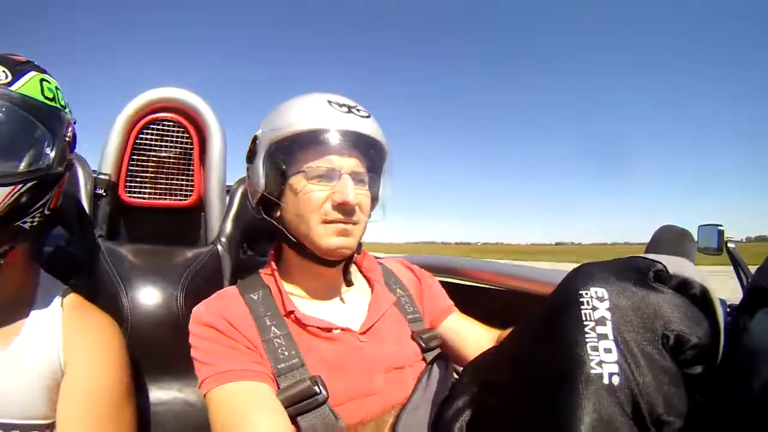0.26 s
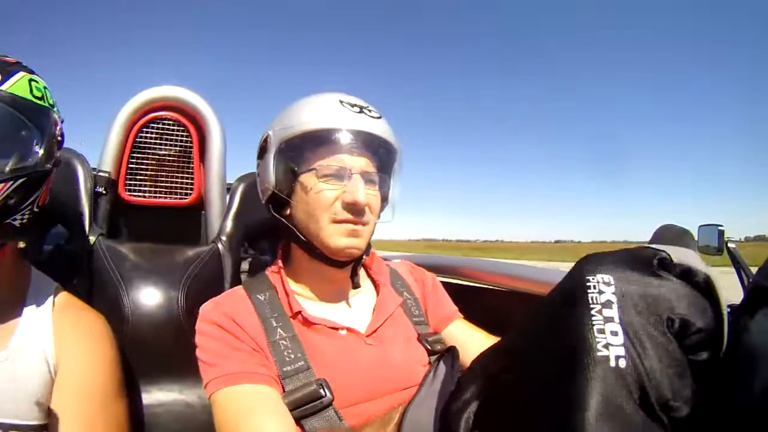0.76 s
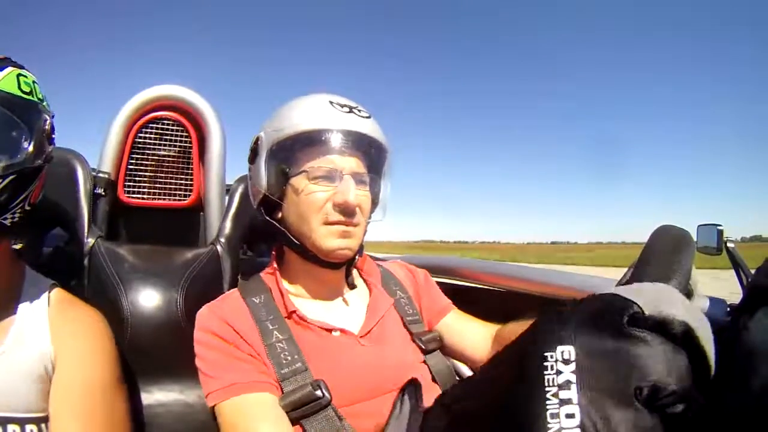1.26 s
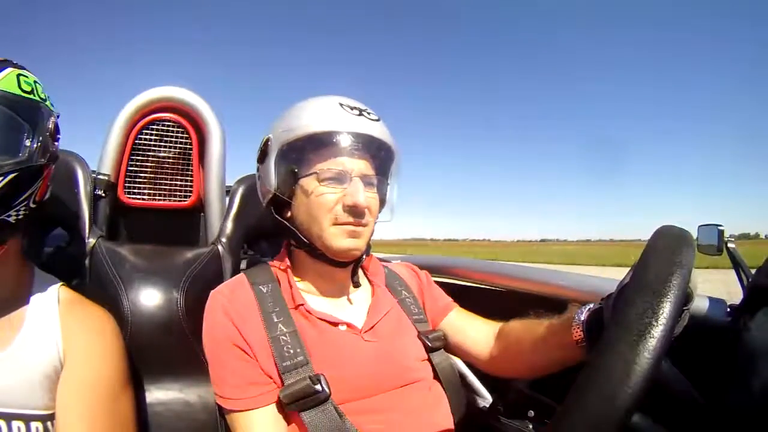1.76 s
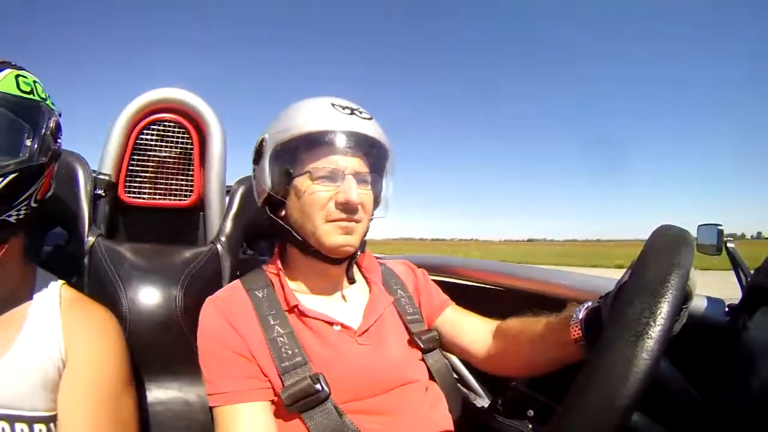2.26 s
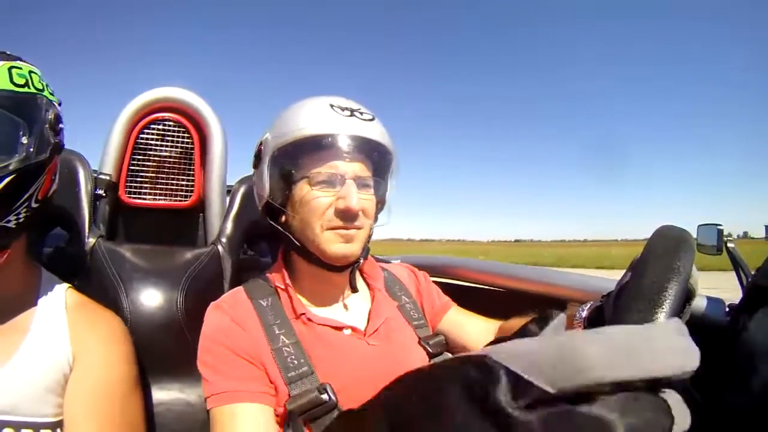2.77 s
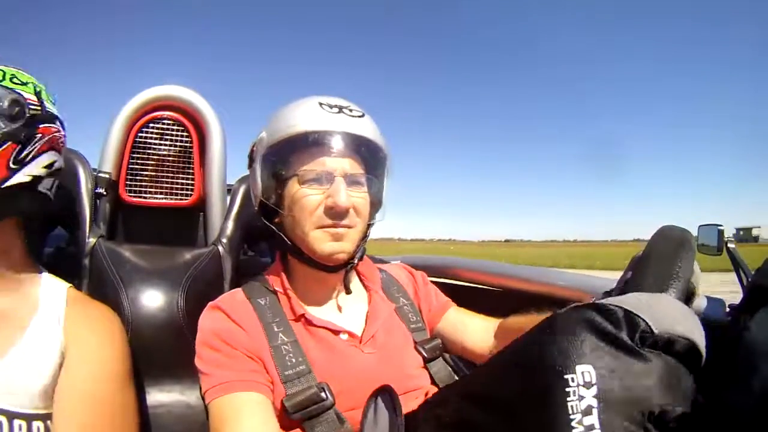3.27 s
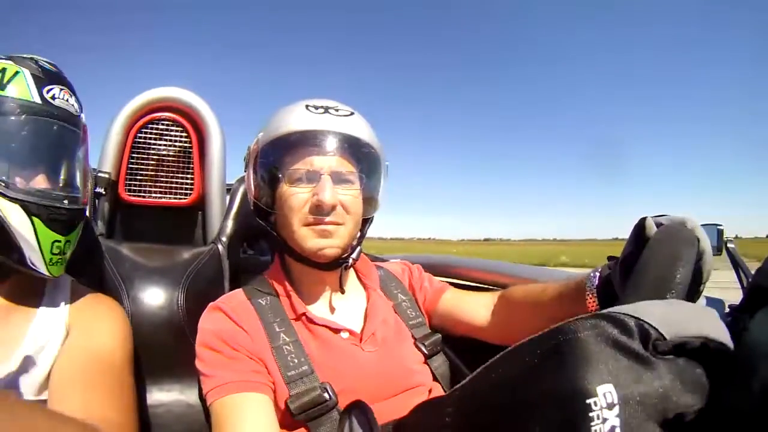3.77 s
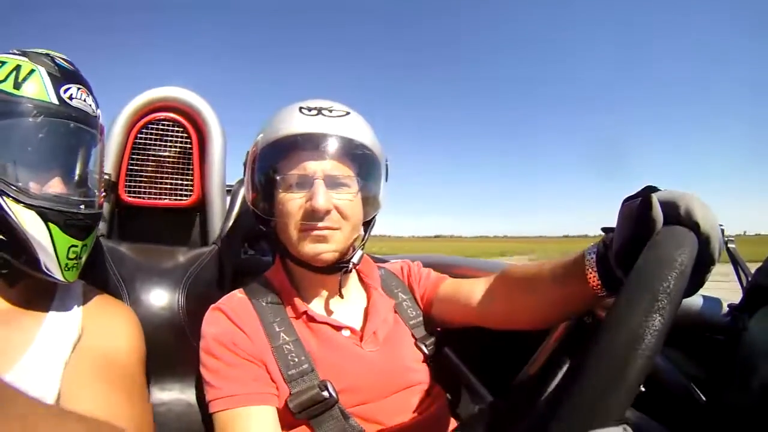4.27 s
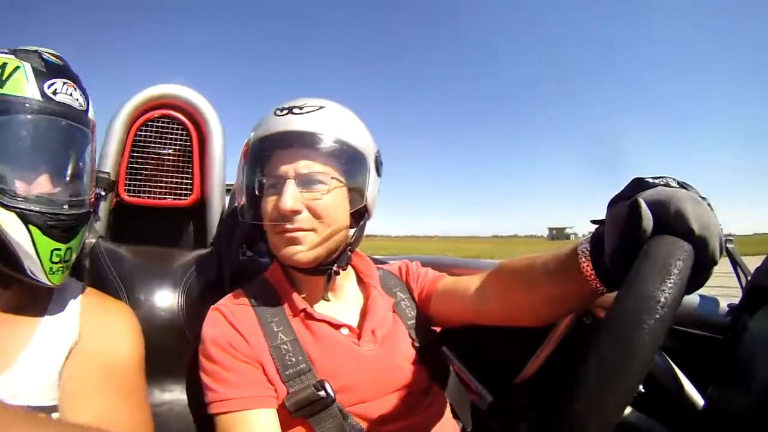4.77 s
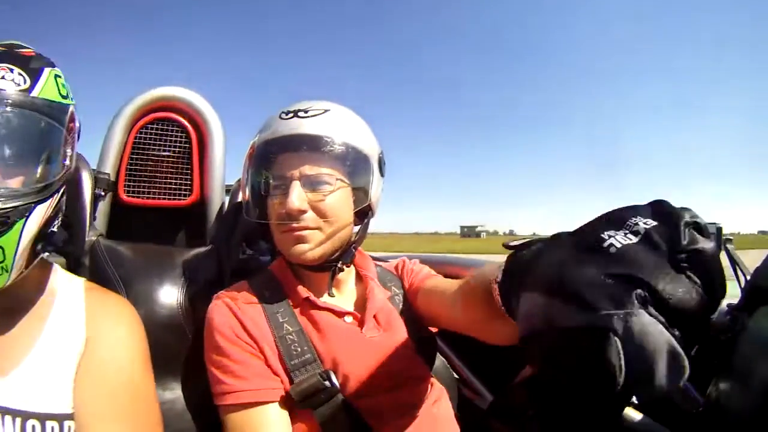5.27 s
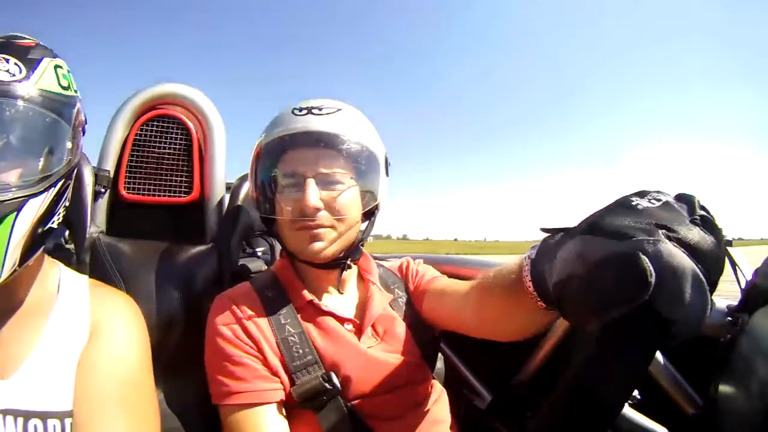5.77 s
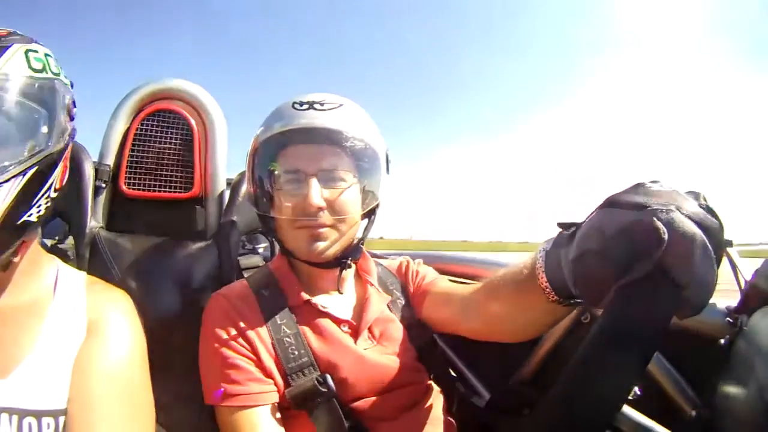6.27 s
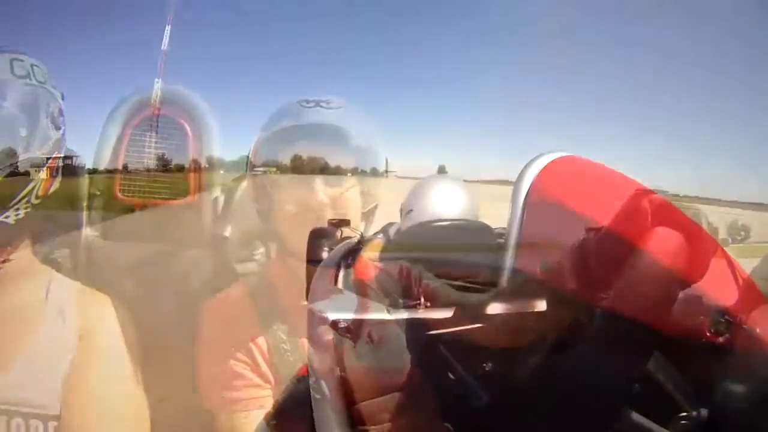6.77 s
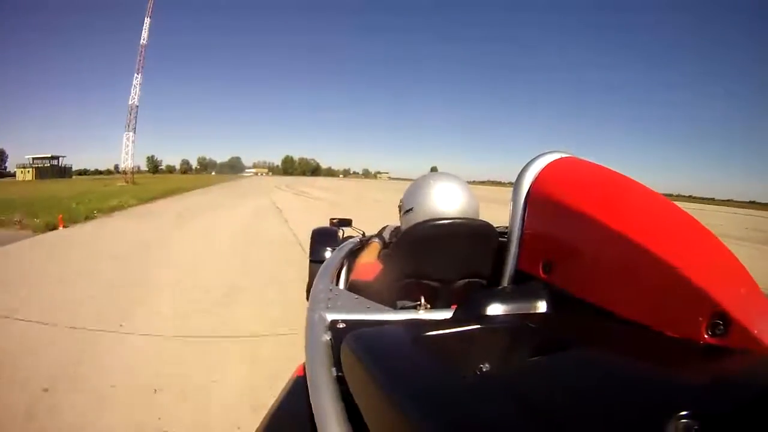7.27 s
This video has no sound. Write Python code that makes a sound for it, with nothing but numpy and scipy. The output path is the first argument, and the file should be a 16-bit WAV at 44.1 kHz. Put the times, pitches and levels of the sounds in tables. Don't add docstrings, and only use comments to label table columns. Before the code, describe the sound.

Close in an open cockpit, a loud four-cylinder exhaust drones downward, blips once on a downshift and sinks to a low rumble. Wind hiss and rattling fade with speed. A hand and cloth tap and scrape the microphone housing, then a tiny silence cuts to a mic beside the engine, overloaded and roaring as the car pulls away.

```python
import sys
import numpy as np
from scipy import signal
from scipy.fft import rfft, irfft, next_fast_len
from scipy.io import wavfile
from scipy.ndimage import uniform_filter1d, map_coordinates

SR = 44100
rng = np.random.default_rng(int(sys.argv[2]) if len(sys.argv) > 2 else 0)


def waveform_to_disk(signal):
    frames = np.transpose(np.atleast_2d(signal))
    scaled = np.clip(frames, -1, 1) * 32767
    samples = np.round(scaled).astype(np.int16)
    wavfile.write(sys.argv[1], SR, samples)


def convert_level_to_amplitude(level_db):
    exponent = np.asarray(level_db, float) / 20
    return 10 ** exponent


N = 332073

# t/s, f/Hz, level/dB
SLOWING = [(0, 179.2, -1), (1.0, 154.4, -0.5), (1.2, 151, -3), (1.8, 138.7, -10), (2.0, 130, -1),
           (2.3, 110.8, -3), (2.5, 100.1, 5), (2.62, 103, 5), (2.8, 122.9, -1.5), (3.0, 142.6, -4.5),
           (3.37, 132.5, 1), (3.71, 119.5, 2.5), (4.05, 109.9, -1), (4.56, 93.7, -1), (5.24, 81.6, -2.5),
           (5.75, 73.07, -6.5), (6.26, 68.26, -4), (6.98, 47.2, -11.5)]
# f/Hz, width/Hz, level/dB
TUB_MODES = [(97.44, 8.1, -9), (112.4, 11.9, -9.5), (133.1, 7.1, -20), (164.2, 20.6, -18.5),
             (245, 19.4, -9.5), (297, 31, -16), (487, 42, -14)]
# f/Hz, width/Hz, share lost/1
TUB_DIPS = [(104.8, 2.1, .75), (124.8, 3.6, 0.53), (147.5, 6.1, .6), (210, 14, .7), (550, 32, .85)]
# t/s, f/Hz, level/dB
PULLING = [(7.04, 50.04, 1), (7.11, 59.47, 1), (7.16, 62.7, 5), (7.22, 63.67, 3.5), (7.33, 69.87, 0.5),
           (7.37, 72.43, -5), (7.49, 78.87, -8.5), (7.53, 79.47, -17.5)]
# f/Hz, level/dB per Hz
SHUDDER = [(15, -14.5), (40, 3), (120, 4), (300, -9.5), (500, -14.5), (900, -26), (3000, -70.5)]
# f/Hz, width/Hz, level/dB
INTAKE = [(755, 410, 1.5), (1932, 326, 6), (4020, 2760, -20)]
# start t/s, end t/s
CUT = (6.986, 7.041)
# t/s, level/dB
RUNWAY = [(0, -8.5), (.29, -19.5), (.47, -8.5), (1.34, -17), (1.9, -16.5), (2.23, -16.5), (2.5, -24.5),
          (2.66, -20.5), (2.78, -18), (3.03, -20.5), (3.46, -16), (3.9, -20), (4.41, -13.5), (4.9, -14.5),
          (5.05, -28.5), (5.48, -20), (6.3, -30), (6.98, -28)]
# f/Hz, width/Hz, level/dB
BOOM = [(97.83, 16.9, 15), (138, 61, -29.5)]
# f/Hz, level/dB per Hz
BUFFET = [(8, -18.5), (25, 11), (45, 3.5), (70, 2.5), (120, -6.5), (300, -65)]
# t/s, width/s, level/dB
GUSTS = [
    (0, .04, 18),
    (1, 0.96, 3.5),
    (6.5, 0.1, 10),
    (6, .2, -6),
]
# f/Hz, level/dB per Hz
TYRES = [(76, -31.5), (130, -0.5), (194, -12.5), (245, -7.5), (301, -4.5), (323, -6.5), (394, -23.5),
         (471, -9.5), (533, -25), (626, -16.5), (812, -29.5), (971, -37), (1100, -45.5), (1430, -70.5),
         (2420, -120)]
# f/Hz, width/Hz, level/dB
MOUNT = [(2450, 900, -12.5), (4650, 1520, 6.5), (6850, 1600, -13), (8450, 1700, -3.5), (11060, 780, -5.5),
         (12900, 740, -8), (14300, 970, -9)]
# t/s, peak level/dB, shell level/dB, crack level/dB
TAPS = [(1.112, -11, -7, -17), (5.504, -26.5, -4, -20), (5.513, -14.5, -8, -15.5), (5.874, -45, 15, -13),
        (5.975, -24, -24, -6.5), (6.0634, -29.5, -6, -11.5), (6.121, -8.5, -39, -21),
        (6.1327, -27.5, -12, 6), (6.138, -9, 3, 2.5), (6.3227, -21, -13, -26), (6.369, -23.5, -20, -30),
        (6.409, -5, -1, -6), (6.4404, -16.5, -20, -16), (6.454, -30.5, -7, -11), (6.468, -33, 2, -11),
        (6.49, -30.5, -1, -6), (6.5032, -17, -3.5, -29), (6.5206, -27, 2, -25), (6.5316, -37.5, -9.5, -15),
        (6.5418, -35.5, -1.5, -11), (6.6076, -33.5, -14, -7), (6.7275, -31, -8, -20),
        (6.734, -23.5, -11, -23), (6.775, -36.5, -13, -9), (6.7838, -42.5, -8, -18), (6.8683, -45, -2, -11),
        (6.9252, -29, -19.5, -11.5), (6.9373, -21.5, -8.5, -22), (6.958, -35, -2.5, -8.5),
        (6.982, -30, -9, -4)]
# f/Hz, width/Hz, level/dB
THIN_WALLS = [(4360, 2500, 8), (7700, 11000, -16), (14000, 2500, -13)]
# t/s, length/s, level/dB
STROKES = [(5.523, 0.012, -38), (5.541, 0.037, -29), (5.573, 0.024, -36), (5.7, 0.052, -41),
           (5.756, 0.043, -33.5), (5.832, 0.029, -41), (5.88, 0.0091, -39), (5.938, 0.014, -46),
           (6.026, 0.016, -43), (6.087, 0.023, -45), (6.439, 0.024, -37), (6.574, 0.021, -51.5),
           (6.696, 0.0099, -50), (6.718, 0.014, -43), (6.785, 0.011, -48.5), (6.857, .015, -43.5)]
# f/Hz, level/dB per Hz
CLOTH = [(530, -42), (900, -15), (1400, -15), (2300, -4.5), (3100, -11.5), (4800, -19.5), (7400, -33),
         (11000, -46), (16000, -50)]
# t/s, width/s, size/full scale
PUSHES = [
    (6.151, 0.0064, 0.12),
    (6.425, 0.0058, -.3),
    (6.448, .004, -0.039),
    (6.458, 0.007, -0.34),
]
# t/s, level/dB
AIRFLOW = [(0, -18), (.72, -22.5), (1.11, -26), (1.75, -27.5), (2.41, -32), (2.78, -33.5), (3.05, -37.5),
           (3.58, -35.5), (4.12, -41.5), (4.53, -43.5), (5.48, -51.5), (5.89, -49.5), (6.34, -51),
           (6.71, -56.5), (6.98, -54.5)]
# f/Hz, level/dB per Hz
HISS = [(290, -20.5), (520, -10.5), (1000, -9), (1500, -8.5), (2200, 0.5), (2600, -1.5), (3300, -10),
        (5000, -14.5), (6200, -29), (8000, -38), (11000, -53.5), (16000, -67.5)]
# f/Hz, width/Hz, level/dB
PANELS = [(682, 68, -0.5), (1332, 267, 1.5), (2200, 290, -3.5), (2503, 120, -0.5)]


def unit(x):
    return x / np.sqrt(np.mean(x ** 2) + 1e-20)


def curves(rows):
    s, *columns = np.transpose(rows)
    return [np.interp(np.arange(N) / SR, s, column) for column in columns]


def wobble(rate):
    knots = rng.standard_normal(int(N * rate / SR) + 4)
    return map_coordinates(knots, [np.arange(N) * rate / SR])


def filtered(x, response):
    m = next_fast_len(N + SR // 2)
    return irfft(rfft(x, m) * response(np.fft.rfftfreq(m, 1 / SR)), m)[:N]


def resonance(f, center, width):
    return 1j * f * width / (center ** 2 - f ** 2 + 1j * f * width)


def modes(table):
    return lambda f: sum((-1) ** k * convert_level_to_amplitude(db) * resonance(f, hz, width)
                         for k, (hz, width, db) in enumerate(table))


def rush(spectrum):
    hz, db = np.transpose(spectrum)
    colour = lambda f: convert_level_to_amplitude(np.interp(np.log(f + 1), np.log(hz + 1), db))
    return unit(filtered(rng.standard_normal(N), colour))


def rung(table):
    return unit(filtered(rng.standard_normal(N), lambda f: modes(table)(f) ** 2))


def note(turns, order, rough):
    size = np.sqrt(2) * convert_level_to_amplitude(6.3 * rough * wobble(25))
    return size * np.sin(order * (2 * np.pi * turns + rough * wobble(18)))


def cabin(f):
    peaks = np.abs(sum(convert_level_to_amplitude(db) * resonance(f, hz, width) for hz, width, db in TUB_MODES))
    left = [1 - np.clip(lost, 0, 1) * np.exp(-((f - hz) / width) ** 2) for hz, width, lost in TUB_DIPS]
    return peaks * np.prod(left, axis=0)


def exhaust():
    hz, load_db = curves(SLOWING)
    turns = np.cumsum(hz) / SR
    first = cabin(hz) * note(turns, order=1, rough=0.18)
    second = convert_level_to_amplitude(-12.5) * cabin(2 * hz) * note(turns, order=2, rough=0.23)
    third = convert_level_to_amplitude(-20) * cabin(3 * hz) * note(turns, order=3, rough=0.13)
    blip = np.clip(np.gradient(hz) * SR / 100, 0, 1)
    sharp = convert_level_to_amplitude(4.3 * np.log2(hz / 126) - 3.5 * uniform_filter1d(blip, SR // 20))
    panel = convert_level_to_amplitude(-38) / (1 + ((4 * hz - 645) / 40) ** 2)
    fourth_size = panel + convert_level_to_amplitude(load_db - 25.5) * cabin(4 * hz)
    fourth = fourth_size * note(turns, order=4, rough=0.066)
    return convert_level_to_amplitude(load_db) * (first + sharp * (second + third)) + fourth


def launch():
    hz, note_db = curves(PULLING)
    turns = np.cumsum(hz * (np.arange(N) / SR > CUT[1])) / SR
    second_db = -6.5 - 11.5 / (1 + ((2 * hz - 135.6) / 14) ** 2)
    second = convert_level_to_amplitude(second_db) * note(turns, order=2, rough=0.23)
    beat = second - convert_level_to_amplitude(note_db) * note(turns, order=1, rough=0.15)
    uneven_cylinders = 0.71 * note(turns, order=0.5, rough=0.16)
    uneven = convert_level_to_amplitude(-12 - 0.23 * note_db) * (uneven_cylinders + rush(SHUDDER))
    intake_db = -24 + 8.88 * np.log2(hz / 67.2)
    gulp = convert_level_to_amplitude(0.86 * np.cos(4 * np.pi * turns + 0.51) + 2.53 * wobble(120))
    breath = unit(filtered(rng.standard_normal(N), modes(INTAKE)))
    return beat + uneven + convert_level_to_amplitude(intake_db) * gulp * breath


def chassis_boom():
    rough_db = curves(RUNWAY)[0]
    return convert_level_to_amplitude(rough_db - 1.5) * rung(BOOM)


def mount(shake):
    swing = filtered(shake, lambda f: (f > 50) & (f < 200))
    size = np.sqrt(np.abs(uniform_filter1d(swing ** 2, SR // 8))) + 1e-4
    depth = np.clip(-swing / size - 0.65, 0, 0.3)
    landing = np.clip(np.diff(depth, prepend=0), 0, None)
    decay_s = 0.003
    contact = filtered(landing, lambda f: 1 / (1 + 2j * np.pi * f * decay_s)) * convert_level_to_amplitude(2.5 * wobble(700))

    def parts(f):
        return np.sqrt(sum(convert_level_to_amplitude(2 * db) * np.abs(resonance(f, hz, width)) ** 4 for hz, width, db in MOUNT))

    chatter = unit(filtered(contact * rng.standard_normal(N), parts))
    smooth_s, slack, growth = 0.009, 0.11, 1.13
    reach = np.abs(uniform_filter1d(swing ** 2, round(smooth_s * SR))) / np.mean(swing ** 2)
    rattle = np.clip(reach - slack, 0, 2.5) ** (growth / 2)
    held_s, tighten_s = 4.91, 1
    loose = np.clip((held_s - np.arange(N) / SR) / tighten_s, 0, 1) ** 0.3
    buzz_db = -45 + 0.48 * np.maximum(curves(AIRFLOW)[0] + 28, 0)
    return convert_level_to_amplitude(buzz_db) * loose * rattle * chatter


def taps():
    soft, cracks = np.zeros(N + SR), np.zeros(N + SR)
    t = np.arange(SR // 25) / SR
    grits = rng.standard_normal((len(TAPS), 3, len(t)))
    for (s, db, shell_db, crack_db), grit in zip(TAPS, grits):
        hz = 2255 * (1 + 0.08 * grit[2, -1])
        ring = np.sin(2 * np.pi * hz * t + 0.34 * np.cumsum(grit[0])) * convert_level_to_amplitude(-60 * t / 0.019)
        shell_tone = np.sin(2 * np.pi * 1300 * t + 0.2 * np.cumsum(grit[1]))
        shell = convert_level_to_amplitude(shell_db - 60 * t / 0.026) * shell_tone
        push = convert_level_to_amplitude(shell_db + 2.5) * (1 - t / 0.0014) * np.exp(-t / 0.002)
        crack = convert_level_to_amplitude(db + crack_db + 3.5 - 60 * t / 0.0034) * np.sign(grit[2])
        start = round(s * SR)
        soft[start:][:len(t)] -= convert_level_to_amplitude(db - 2) * (ring + shell + push)
        cracks[start:][:len(t)] += crack
    muffled = filtered(soft[:N], lambda f: 1 / (1 + 1j * f / 3500) ** 3)
    return muffled + filtered(cracks[:N], lambda f: modes(THIN_WALLS)(f) ** 2)


def cloth_scrapes():
    now, strokes = np.arange(N) / SR, np.zeros(N)
    for s, span, db in STROKES:
        swell = (now - s) / (0.6 * span + 0.008)
        stop = (s + span - now) / 0.008
        strokes += convert_level_to_amplitude(db) * np.clip(np.minimum(swell, stop) + 0.63, 0, 1) ** 2
    grains = convert_level_to_amplitude(2.1 * wobble(400) + 2.3 * wobble(65))
    return strokes * unit(grains * rush(CLOTH))


def hand_pushes():
    now = np.arange(N) / SR
    return sum(size * np.exp(-((now - s) / width) ** 2) for s, width, size in PUSHES)


def buffeting():
    now = np.arange(N) / SR
    gust_db = sum(db * np.exp(-((now - s) / width) ** 2) for s, width, db in GUSTS)
    return convert_level_to_amplitude(gust_db - 27) * rush(BUFFET)


def tyre_roar():
    rough_db, air_db = curves(RUNWAY)[0], curves(AIRFLOW)[0]
    fade_db = 0.48 * np.minimum(air_db + 39, 0)
    shaken_db = 0.12 * (rough_db - rough_db.mean())
    flutter_db = 0.84 * wobble(8.9) + 1.16 * wobble(60)
    return convert_level_to_amplitude(-25 + fade_db + shaken_db + flutter_db) * rush(TYRES)


def wind_hiss():
    flutter_db = 0.94 * wobble(8.1) + 0.93 * wobble(70) + 1.56 * wobble(220)
    return convert_level_to_amplitude(curves(AIRFLOW)[0] + 1.5 + flutter_db) * rush(HISS)


def panel_hum():
    air_db, hz = curves(AIRFLOW)[0], curves(SLOWING)[0]
    sing_db = 13.5 / (1 + ((hz - 122.2) / 9.1) ** 2)
    hum_db = -47 + 0.38 * (air_db - air_db.mean()) + sing_db
    return convert_level_to_amplitude(hum_db + 2.2 * wobble(7)) * rung(PANELS)


def scene():
    t = np.arange(N) / SR
    shake = exhaust() + chassis_boom() + buffeting() + tyre_roar()
    handling = taps() + cloth_scrapes() + hand_pushes()
    cockpit = shake + mount(shake) + handling + wind_hiss() + panel_hum()
    fade_in = np.clip((t - CUT[1]) / 0.0043, 0, 1)
    return (cockpit * (t < CUT[0]) + launch() * fade_in)[None]


def roll_off(x):
    return signal.sosfilt(signal.butter(12, 16000, fs=SR, output="sos"), x)


def record(dry):
    top, hardness = 0.68, 8
    clipped = dry[0] / (1 + np.abs(dry[0] / top) ** hardness) ** (1 / hardness)
    coupled = filtered(clipped, lambda f: 1j * f / (1.5 + 1j * f) / (1 + (f / 15700) ** 24))
    return roll_off(coupled[None])


dry = scene()
out = record(dry)
waveform_to_disk(out)
```